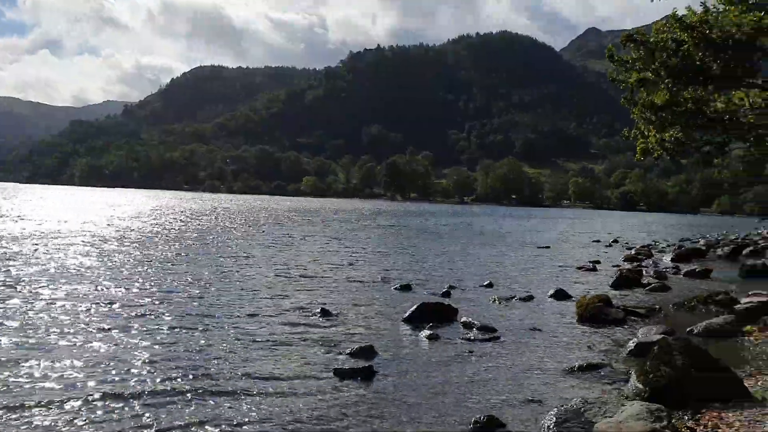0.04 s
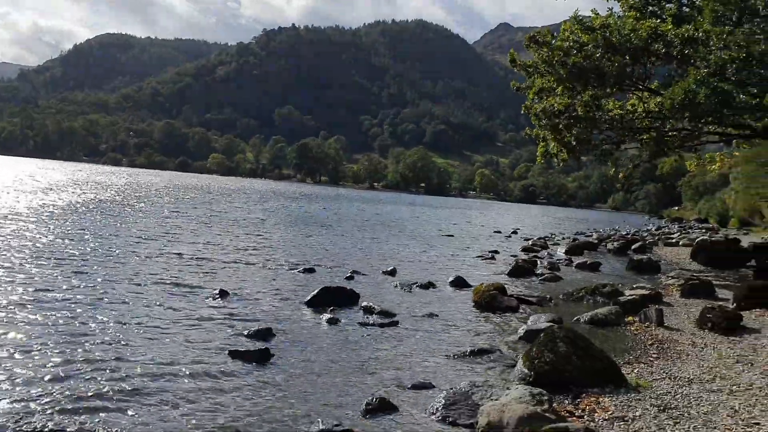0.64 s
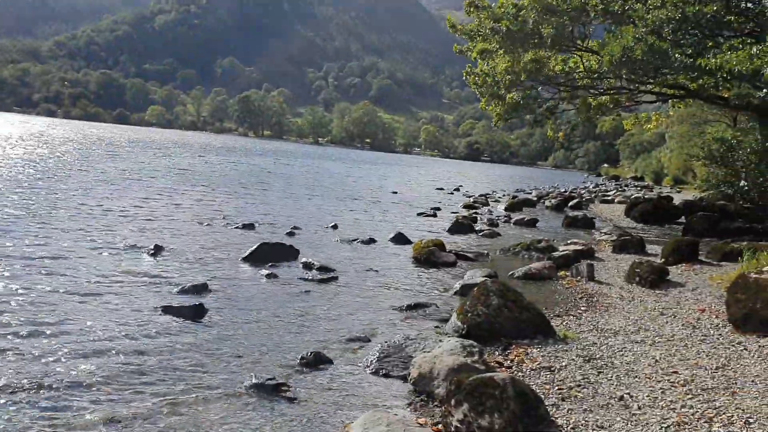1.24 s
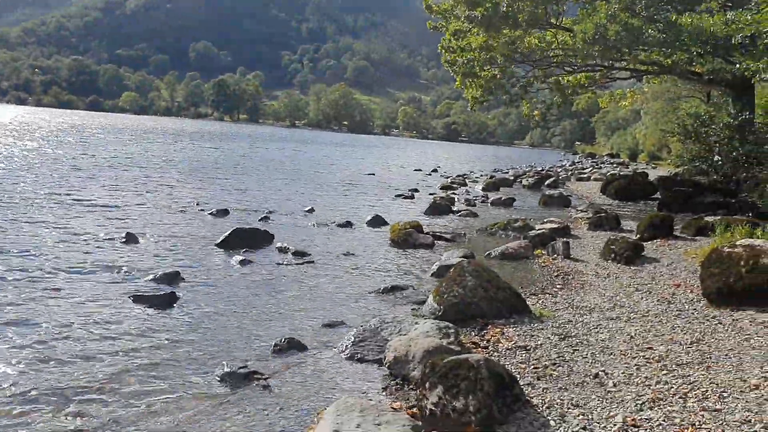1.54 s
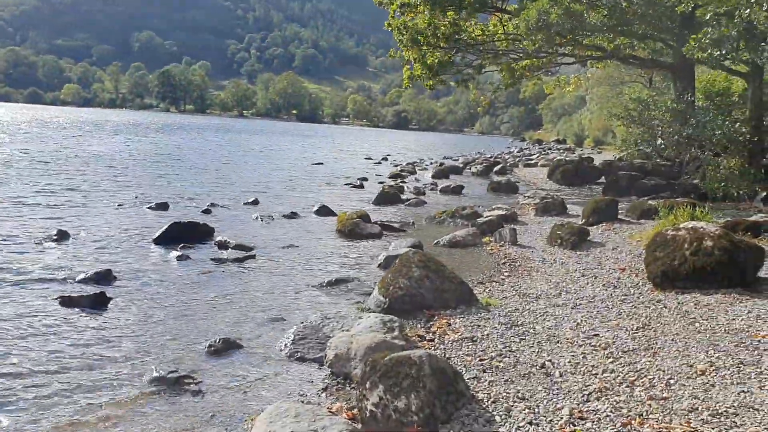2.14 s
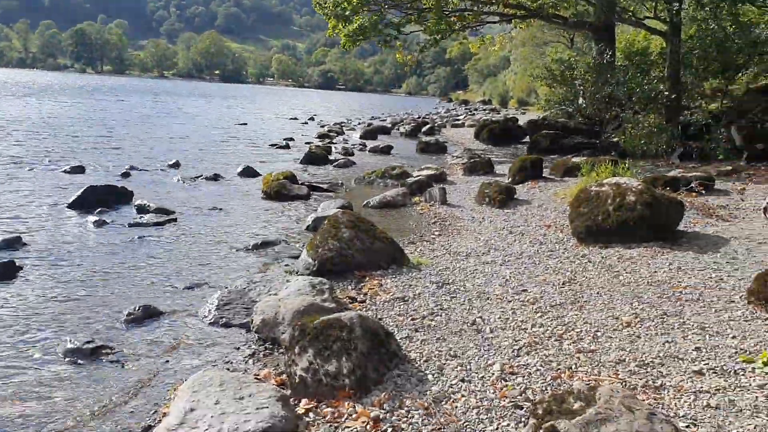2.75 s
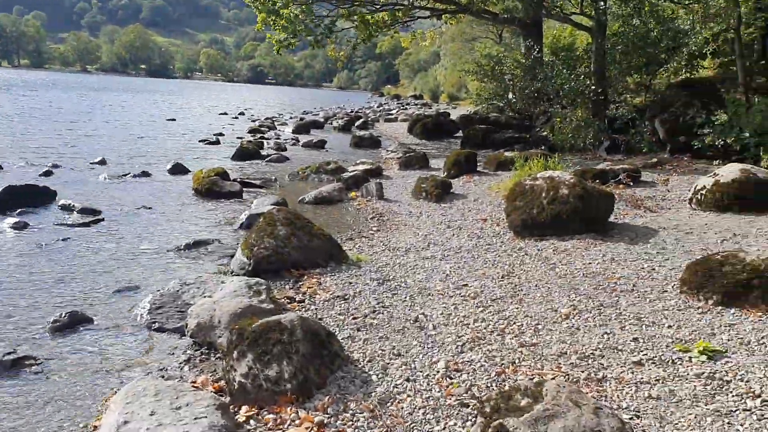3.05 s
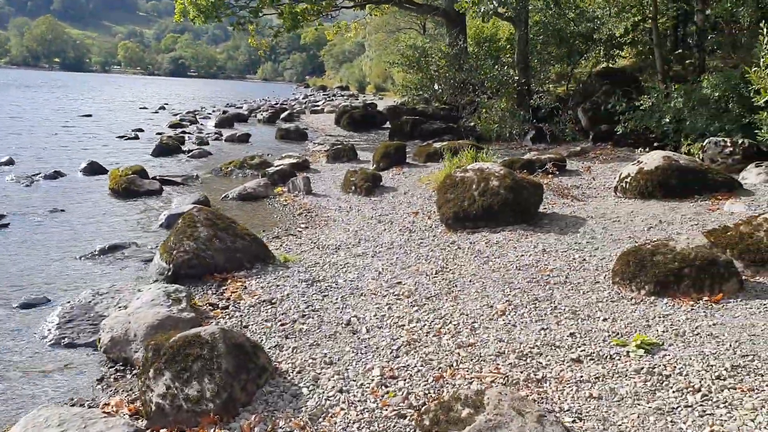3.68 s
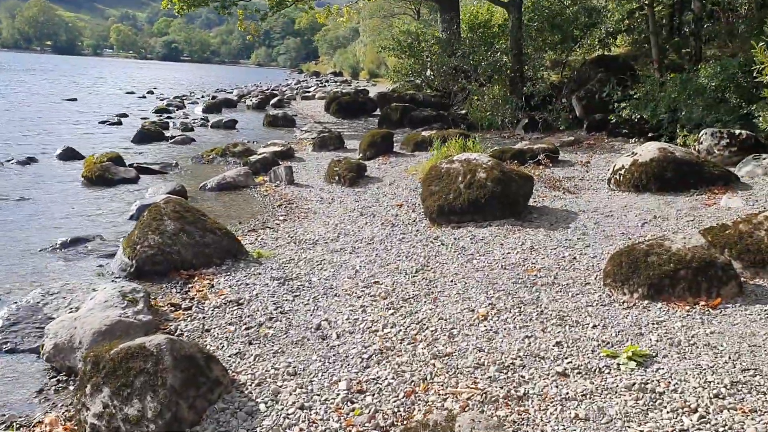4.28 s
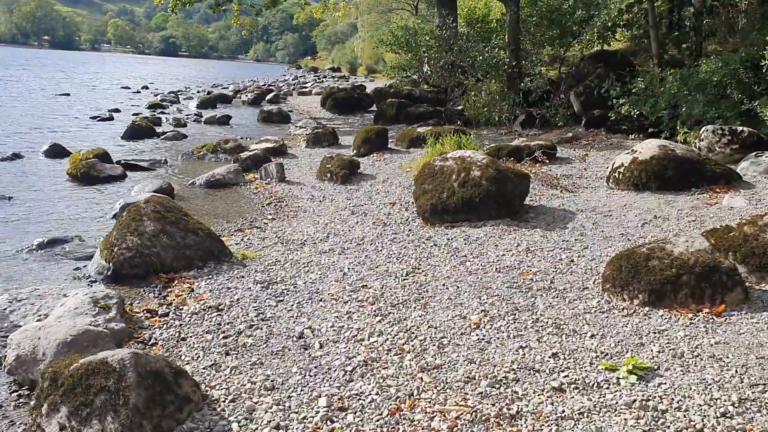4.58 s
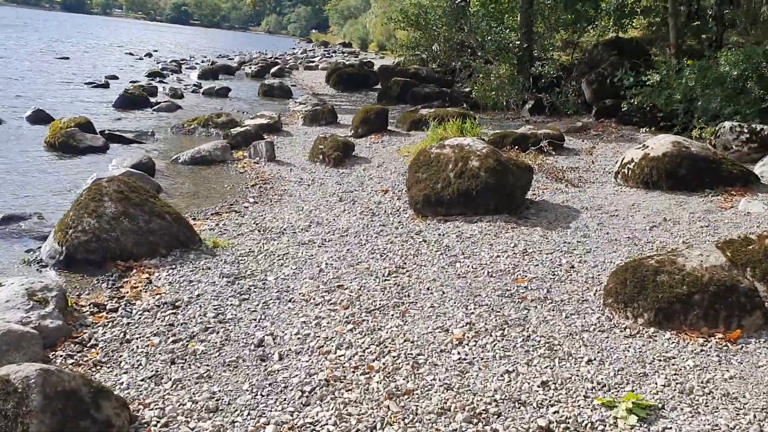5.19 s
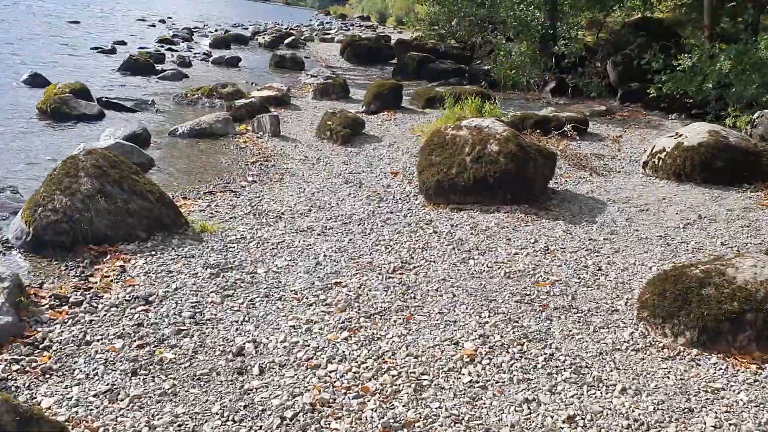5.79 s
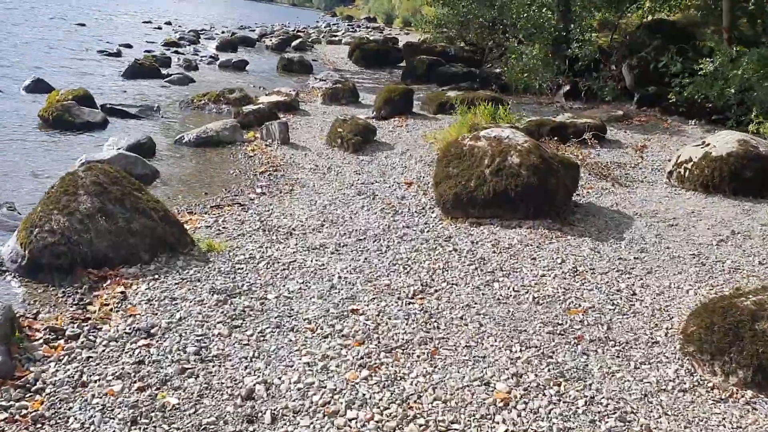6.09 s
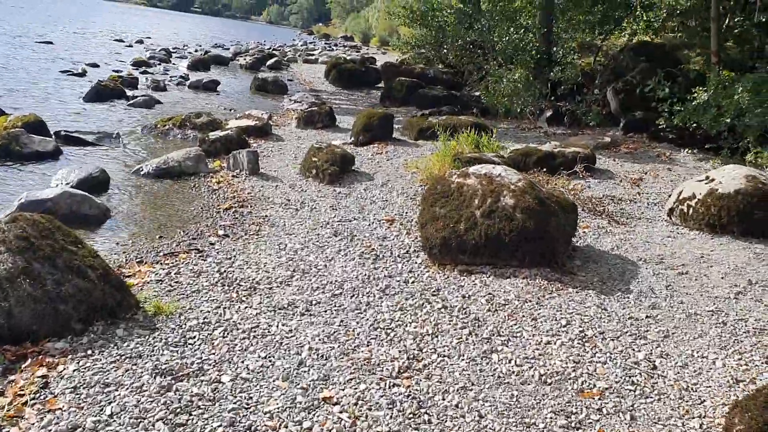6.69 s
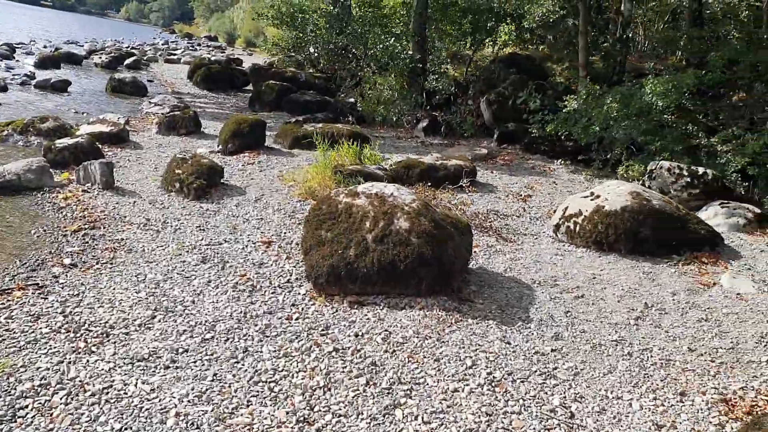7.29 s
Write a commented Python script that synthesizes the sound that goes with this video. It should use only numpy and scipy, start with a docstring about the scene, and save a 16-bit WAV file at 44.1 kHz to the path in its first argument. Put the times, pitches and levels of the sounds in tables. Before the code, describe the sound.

Wind buffets the microphone over slow, crunching steps on pebbles, with faint lapping water and a soft background hiss.

```python
"""Slow steps on a windy pebble beach

Each foot crunches into the pebbles, heel then ball, and single stones knock together.
Gusts hit the two microphone openings (ports), making rumble, flutter and popping swirls of air.
Small waves lap and bubble at the lake's edge under a steady hiss of water and leaves."""
import sys
import numpy as np
from scipy import signal
from scipy.fft import rfft, irfft, next_fast_len
from scipy.io import wavfile
from scipy.ndimage import uniform_filter1d, map_coordinates

SR = 44100
rng = np.random.default_rng(int(sys.argv[2]) if len(sys.argv) > 2 else 0)


def transcribe(u):
    """Save the signal u as a 16-bit wav file named by the first command-line argument.

    u: samples, shape (n,) or (channels, n), limited to [-1, 1]; the rate is SR.
    q: integer samples, one column per channel.
    """
    v = np.clip(np.atleast_2d(u).T, -1, 1)
    q = np.round(v * 32767).astype(np.int16)
    wavfile.write(sys.argv[1], SR, q)


N = 323253

# A heel or the ball of a foot pressing down: start_s, rise_s, fade_db_per_s, pebbles_db, stones_db,
# grit_db, stones_ring_hz, grit_ring_hz, grit_tilt_db_per_octave
CRUNCHES = [(1.385, 0.049, 35, -57, -51.0, -54, 3770, 9000.0, -1.0),
            (1.5, 0.155, 131, -41.5, -42.5, -50.5, 3700.0, 9000.0, -3),
            (2.877, 0.003, 300.0, -56, -45, -41, 5670.0, 9400.0, -2),
            (2.887, 0.093, 164, -41.5, -44, -47, 5000.0, 10100.0, -2),
            (3.08, 0.071, 40, -48.5, -53.5, -57.5, 3980, 10000.0, -2),
            (3.657, 0.047, 84, -38.5, -42, -47.5, 4200.0, 10600.0, 1),
            (3.726, 0.08, 154, -40, -52, -56, 3800.0, 10600.0, 0.0),
            (3.865, 0.038, 340.0, -50, -59, -54.5, 4000.0, 10600.0, 4),
            (4.338, 0.0022, 229, -40, -39.5, -37, 4000.0, 12000.0, 9),
            (4.372, 0.035, 75, -42, -49, -50, 2950, 12000.0, 5),
            (4.56, 0.1, 271, -53, -57.5, -59, 3000.0, 11000.0, -5),
            (5.073, 0.148, 169, -46, -51.5, -52.5, 3500.0, 10400, 1),
            (5.276, 0.033, 150.0, -65, -62, -55, 4000.0, 10440, 0.5),
            (5.849, 0.057, 167.0, -41, -45.5, -49.5, 2740.0, 10400.0, 7),
            (5.975, 0.059, 143.0, -54, -49.5, -51.5, 3000.0, 10400.0, 1.0),
            (6.405, 0.0098, 120, -38.0, -45.5, -41, 4520, 11000.0, -2),
            (6.46, 0.12, 172, -38.5, -46.5, -60, 3000.0, 11000.0, 8),
            (7.103, 0.041, 376.0, -34.5, -38.5, -40, 5760, 10300, -4),
            (7.18, 0.043, 378, -45.5, -43.5, -51, 4300, 10400.0, 4)]
# Single stones hitting each other: start_s, level_db, pitch_hz
PEBBLE_KNOCKS = [(.147, -34, 1520), (.151, -32, 1430), (2.105, -25.5, 1610), (2.145, -20.5, 1800),
                 (2.209, -21.5, 1300), (2.354, -30.5, 1020), (2.43, -34, 2400), (3.139, -29, 1240),
                 (3.214, -23.5, 1250), (3.277, -19, 1340), (3.326, -22, 1280), (5.087, -34, 1400),
                 (5.194, -23.5, 1220), (5.871, -30, 1950), (5.901, -19, 1390), (6.445, -20.5, 1110),
                 (6.472, -19.5, 1240), (6.601, -22, 1580), (7.049, -29, 1260)]
GRIT_SNAPS = [(.149, -27.5, 4000), (.303, -42, 3900), (2.064, -38, 4200), (2.486, -40, 8900),
              (2.703, -37, 3200), (2.879, -24, 8800), (2.882, -26, 5600), (2.928, -37, 4200),
              (3.686, -23, 4560), (3.772, -22.5, 3700), (4.343, -19.5, 11900), (4.362, -29, 9500),
              (4.371, -26, 10600), (4.391, -35, 12500), (5.405, -39, 9070), (5.415, -39, 8620),
              (5.48, -45, 8770), (5.902, -23, 2600), (6.025, -30.5, 3000), (6.257, -37, 9500),
              (6.306, -35, 9900), (6.353, -39, 9000), (6.427, -25, 10700), (6.442, -24, 11300),
              (6.491, -40, 11000), (6.613, -23, 5200), (7.124, -23, 5600), (7.245, -29, 3200)]
# The tones that a struck stone rings with: pitch_ratio, level_db
PEBBLE_TONES = [(.72, -49), (1, 9), (1.38, 0.5), (1.9, -7), (2.7, -12)]
GRIT_TONES = [(.7, -30), (.85, -4), (1, 12), (1.09, 2), (1.22, -5)]
# How strong the low and high sounds are in each size of stone: frequency_hz, level_db
PEBBLE_SPECTRUM = [(300, -49), (700, -2.5), (1100, -4), (1450, 1), (2000, -5.5), (2800, -10.5), (4000, -23),
                   (8000, -50)]
SMALL_STONE_SPECTRUM = [(1500, 10), (2400, -5), (3200, -4.5), (4200, -5.5), (5400, -3.5), (6500, -4),
                        (8000, -11), (14000, -50)]
GRIT_SPECTRUM = [(4500, 6.5), (7600, -8), (8700, -1.5), (10300, -4), (11700, -4.5), (13500, -7),
                 (16000, -6)]

# The slow rise and fall of the wind: time_s, rumble_db, flutter_db
WIND_LEVELS = [(0.0, -39.5, -47), (1.01, -42.3, -53), (1.75, -37.5, -50.2), (2.05, -40.5, -68),
               (2.45, -37.5, -51.5), (2.55, -47.5, -68), (2.82, -41.5, -43), (2.92, -32, -44.5),
               (3.59, -31.5, -32.5), (3.78, -27.5, -29.5), (4.35, -29, -35), (4.55, -34.7, -31.5),
               (4.85, -33.5, -33), (5.15, -39.5, -46), (5.27, -34, -33.5), (6.58, -32, -37.5),
               (6.74, -40.9, -56), (7.33, -33, -39)]
# Gusts on top of it: peak_s, length_s, rumble_db, flutter_db, left_minus_right_db
GUSTS = [(0.153, 0.024, -31, -53, -1), (0.23, 0.03, -38.5, -36, 6), (0.295, 0.02, -26, -35.5, 2),
         (0.616, 0.046, -27.5, -33.5, 1), (0.733, 0.044, -35.5, -40, -5), (0.89, 0.1, -36, -48.5, -5.5),
         (1.15, 0.15, -37, -35.5, -4), (1.294, 0.049, -39, -42.5, -3), (1.442, 0.03, -31.5, -38, -3),
         (1.543, 0.077, -35.5, -37, -2), (1.698, 0.039, -27.5, -36, 1.5), (1.86, 0.17, -34, -37, -3),
         (2.263, 0.063, -46, -41, 0.5), (2.464, 0.054, -33.5, -48, -3), (2.709, 0.069, -29, -38, -5),
         (3.09, 0.055, -26, -37.5, -6), (3.509, 0.025, -29, -31, -8), (3.805, 0.17, -30, -26, -2),
         (4.161, 0.057, -38, -23, -4.5), (4.24, 0.031, -20, -25.5, 1), (4.348, 0.14, -28, -22.5, 0),
         (4.456, 0.043, -42, -24, 3), (4.71, 0.11, -43, -23.5, -1.5), (4.817, 0.079, -30, -27.5, -1),
         (5.018, 0.067, -36, -32, -0.5), (5.425, 0.04, -49, -31.5, -2), (5.919, 0.06, -21.5, -26, -0.5),
         (6.022, 0.049, -26, -33, 0), (6.31, 0.17, -36, -30, -0.5), (6.552, 0.096, -35, -25, 1),
         (6.676, 0.032, -36, -29.5, 4.5), (6.814, 0.036, -30, -31.5, 1.5), (6.883, 0.038, -43, -30, -3),
         (7.002, 0.07, -34, -44.5, -2), (7.239, 0.0094, -24.5, -31, -6.5)]
# The hardest swirls of air: time_s, level_db, pitch_hz, relative_rasp_db, left_minus_right_db
EDDIES = [(0.22, -14, 291, -38, 1), (0.29, -24, 370, -24, 4), (0.636, -18.5, 414, -19, -2),
          (0.777, -21, 335, -26, 1), (1.181, -16.5, 392, -35, 13), (1.84, -17, 360, -25, -7),
          (3.103, -15, 160, -14, -3), (3.495, -12, 430, -19, -1), (3.567, -23.5, 454, -1, 9),
          (3.974, -12, 107, -29, -6), (4.055, -17, 440, -3.5, -11.5), (4.152, -13.5, 430, -7, 7),
          (4.185, -18, 560, -2.5, -14), (4.226, -2, 393, -10.5, -0.5), (4.244, -6, 402, -24, -2),
          (4.277, -9.5, 500, -2, 1), (4.394, -19.5, 340, 4.5, -8), (4.668, -13, 400, -1.5, 5),
          (4.703, -11.0, 407, -6.5, -1), (4.722, -10.9, 445, -26, 11), (4.769, -14.5, 458, -16, 1),
          (5.778, -14.5, 517, -11, 5.5), (5.967, -13, 413, -20, -2), (6.343, -20.5, 420, -0.5, -1),
          (6.506, -10, 483, -11, 1.5), (6.818, -17, 370, -22, -2)]
# The wind's deep, middle and bright sounds: frequency_hz, level_db
RUMBLE_SPECTRUM = [(15, -24), (30, -13), (55, -4), (80, 0), (120, -5), (200, -13), (350, -19), (800, -88),
                   (2000, -92)]
FLUTTER_SPECTRUM = [(80, -14), (180, -6), (280, -2), (370, -0.5), (480, -5), (650, -18), (900, -33),
                    (1400, -38), (3000, -93), (8000, -110)]
TEARING_SPECTRUM = [(200, -55), (450, 3), (650, 4.5), (900, -5), (1400, -28), (2200, -30), (4000, -65),
                    (9000, -68)]

# Small waves running up the shore: peak_s, level_db
WAVES = [(0.57, -59), (0.81, -60.5), (1.25, -53.5), (1.81, -46.5), (2.13, -49.5), (2.43, -51), (3.17, -57),
         (3.57, -53), (4.04, -49.5), (4.55, -51), (5.66, -57.5), (6.36, -53), (7.07, -53)]
# Single bubbles at the water's edge: start_s, level_db, pitch_hz
PLIPS = [(.526, -50, 2050), (.559, -45, 2370), (1.86, -39.5, 2540), (3.423, -40.5, 2080),
         (3.653, -40, 2350), (6.815, -45, 2150)]
# Level of the background hiss, which dips when strong wind hits the microphone: time_s, level_db
HISS_LEVELS = [(0.0, -51), (1.6, -50), (2.51, -50), (3.74, -48.5), (4.15, -52.6), (4.55, -51),
               (4.75, -57.5), (5.8, -54.5), (6.33, -49), (6.79, -51.5), (7.33, -50.7)]
# The tone of the waves and of the hiss: frequency_hz, level_db
LAPPING_SPECTRUM = [(300, -22), (700, 8.5), (1300, 1.5), (2400, 3), (4000, -0.5), (7000, -17), (12000, -40)]
HISS_SPECTRUM = [(530, 7.5), (900, 1.5), (1080, -1), (1260, -3), (1450, -5.5), (4380, -5.5), (6740, -10.5),
                 (7340, -14.5), (8570, -8), (9780, -8), (11800, -11.5), (14400, -19), (15800, -24)]

HOLD_S = 0.016  # time with full weight on the stones
WAKE_DB, WAKE_RISE_S, WAKE_FADE_S = -13, .0015, 0.069  # churning air behind an eddy
WAVE_S, RIPPLE_DB = 0.15, -62  # length of a wave; level of the ripples between waves
TOP_HZ = 15900


def steps():
    """Under each foot pebbles grind, small stones rattle and grit sizzles, in jerks as they give way."""
    grinding = shingle(PEBBLE_SPECTRUM, per_s=1000, band_hz=(900, 2800),
                       cycles=3, spread_db=3.8, scatter=.55)
    rattle = shingle(SMALL_STONE_SPECTRUM, per_s=1300, band_hz=(2300, 7500),
                     cycles=4, spread_db=4.2, scatter=1.5)
    sizzle = shingle(GRIT_SPECTRUM, per_s=2200, band_hz=(7000, 15000),
                     cycles=3, spread_db=4.2, scatter=1.4)
    out = np.zeros((2, N))
    for s, rise_s, fade, pebbles_db, stones_db, grit_db, stones_hz, grit_hz, tilt_db in CRUNCHES:
        span = np.arange(N)[round(s * SR):][:2 * SR // 3]
        t = np.arange(len(span)) / SR
        press = np.sin(np.pi / 2 * np.minimum(t / rise_s, 1)) ** 2
        release = amp(-fade * np.maximum(t - rise_s - HOLD_S, 0))
        pebbles = amp(pebbles_db) * grinding[:, span]
        stones = amp(stones_db) * ringing(rattle[:, span], stones_hz, boost_db=5, octaves=0.34)
        grit = amp(grit_db) * ringing(sizzle[:, span], grit_hz, boost_db=1.5, octaves=.15, tilt=tilt_db)
        out[:, span] += press * release * (pebbles + stones + grit)
    jerks = unit(amp(0.76 * wobble(120) + 1.9 * wobble(35)))
    return out * jerks


def shingle(spectrum, per_s, band_hz, cycles, spread_db, scatter):
    """Countless tiny stone clicks, heard directly and bouncing off the beach."""
    direct, left, right = [grains(per_s, band_hz, cycles, spread_db) for _ in range(3)]
    clicks = from_the_ground(direct) + scatter * np.array([left, right])
    return steady(coloured(clicks, spectrum), seconds=0.033)


def ringing(x, ring_hz, boost_db, octaves, tilt=0):
    """A patch of beach rings around its own pitch; tilt (dB per octave) brightens or dulls it."""
    def response(hz):
        octaves_away = np.log2(np.maximum(hz, ring_hz / 2) / ring_hz)
        return amp(tilt * octaves_away + boost_db * np.exp(-(octaves_away / octaves) ** 2))
    return unit(filtered(x, response))


def stone_hits(hits, tones, fade_s, crack, echo_db, echo_s):
    """Stone on stone: a crack and a few short tones, echoed faintly by the stones around."""
    out, t = np.zeros(N), np.arange(SR // 20) / SR
    for s, db, hz in hits:
        ring = sum(amp(tone_db) * np.sin(2 * np.pi * hz * ratio * (1 + .02 * rng.normal()) * t)
                   for ratio, tone_db in tones)
        click = (ring + crack * rng.standard_normal(len(t))) * amp(-60 * t / fade_s)
        echoes = rng.standard_normal(len(t)) * amp(echo_db - 60 * t / echo_s)
        echoes[0] = 1  # the direct sound
        add(out, s + .0008, signal.fftconvolve(amp(db) * click / np.abs(click).max(), echoes))
    return from_the_ground(out)


def wind():
    """Rumble and flutter on the ports swell with each gust; the hardest gusts tear into brighter pops."""
    base_rumble_db, base_flutter_db = curves(WIND_LEVELS)
    rumble_db, flutter_db = np.zeros((2, 2, N))
    peak_s, length_s, low_db, mid_db, pan_db = np.transpose(GUSTS)
    for port, side in enumerate((.5, -.5)):
        rumble_db[port] = swelling(base_rumble_db, zip(peak_s, length_s, low_db + side * pan_db))
        flutter_db[port] = swelling(base_flutter_db, zip(peak_s, length_s, mid_db + side * pan_db))
    rumble = steady(turbulence(lump_db=7.0, lumps_per_s=45, shared=0.78), seconds=0.053)
    soft_puffs = puffs(per_s=380, spread_db=5.5, crossing_ms=2.077) + 0.26 * rng.standard_normal((2, N))
    flutter = steady(coloured(soft_puffs, FLUTTER_SPECTRUM), seconds=0.047) * amp(1.53 * wobble(22))
    hard_puffs = puffs(per_s=150, spread_db=7.5, crossing_ms=1.694)
    pops = steady(coloured(hard_puffs, TEARING_SPECTRUM), seconds=0.2)
    pops_db = -33.5 + 1.56 * (flutter_db + 24)  # pops grow faster than the flutter
    return amp(rumble_db - 0.02) * rumble + amp(flutter_db - 0.28) * flutter + amp(pops_db) * pops


def turbulence(lump_db, lumps_per_s, shared):
    """Rough air rumbles in lumps, partly the same lumps at both ports."""
    common, left, right = [wobble(lumps_per_s) for _ in range(3)]
    lumps = np.sqrt(shared) * common + np.sqrt(1 - shared) * np.array([left, right])
    return coloured(rng.standard_normal((2, N)) * amp(lump_db * lumps), RUMBLE_SPECTRUM)


def puffs(per_s, spread_db, crossing_ms):
    """Random puffs of air; each meets the two ports at slightly different times and strengths."""
    draws = rng.standard_normal((int(per_s * N / SR), 6)).T
    direction, strength, port_strength, port_delay = draws[0], draws[1], draws[2:4], draws[4:]
    starts = rng.random(len(strength)) * N
    out = np.zeros((2, N))
    for port in range(2):
        size = np.sign(direction) * amp(spread_db * np.clip(strength + port_strength[port] / 2, -3, 2))
        arrivals = starts + port_delay[port] * crossing_ms * SR / 1000
        out[port] = np.bincount(arrivals.astype(int) % N, size, N)
    return unit(out)


def eddies(crossing_ms=0.42, rasp_hz=950):
    """A swirl of air passes both ports: a quick swing of pressure, a sharp rasp, then a churning wake."""
    out, t = np.zeros((2, N)), np.arange(-SR // 50, SR // 20) / SR
    wake_shape = (1 + np.tanh(t / WAKE_RISE_S)) / 2 * amp(WAKE_DB - 60 * t / WAKE_FADE_S)

    def swing(hz, phase, cycles):
        bell = np.exp(-(t * hz / cycles) ** 2)
        return bell * np.cos(2 * np.pi * (hz * t + phase + 0.14 * rng.normal()))

    for s, db, hz, rasp_db, pan_db in EDDIES:
        phase = rng.random()
        for port, side in zip(out, (.5, -.5)):
            body = swing(hz, phase, cycles=0.74)
            rasp = amp(rasp_db - 2) * swing(rasp_hz, phase, cycles=0.56)
            churn = coloured(rng.standard_normal(len(t)), FLUTTER_SPECTRUM)
            tearing = 2 * amp(rasp_db) * coloured(rng.standard_normal(len(t)), TEARING_SPECTRUM)
            wake = (churn + tearing) * wake_shape
            start_s = s + t[0] + crossing_ms * rng.normal() / 1000
            add(port, start_s, amp(db - 3.5 + side * pan_db) * (body + rasp + wake))
    return out


def waves():
    """Small waves fizz and bubble among the rocks."""
    level_db = swelling(RIPPLE_DB, [(s, WAVE_S, db) for s, db in WAVES])
    bubbles = [grains(per_s=600, band_hz=(1005, 4520), cycles=5.3, spread_db=5.5, rise=0.019)
               for _ in range(2)]
    wash = np.array(bubbles) + 0.63 * rng.standard_normal((2, N))
    return amp(level_db + 0.83 * wobble(41)) * coloured(wash, LAPPING_SPECTRUM)


def plips(fade_s=0.046, onset_s=0.00031, rise=1.9):
    """A bubble rings briefly and rises in pitch as it nears the surface."""
    out, t = np.zeros(N), np.arange(SR // 20) / SR
    for s, db, hz in PLIPS:
        loudness = amp(db - 60 * t / fade_s) * (1 - np.exp(-t / onset_s))
        add(out, s, loudness * np.sin(2 * np.pi * hz * t * (1 + rise * t)))
    return from_the_ground(out)


def hiss():
    """The lake and the leaves blend into one background hiss."""
    level_db, = curves(HISS_LEVELS)
    noise = rng.standard_normal((2, N)) + 0.22 * rng.standard_normal(N)
    return amp(level_db) * coloured(noise, HISS_SPECTRUM)


def grains(per_s, band_hz, cycles, spread_db, rise=0):
    """A random stream of tiny fading rings; rise bends each one upward like a bubble."""
    low_hz, high_hz = band_hz
    when, pitch, strength, direction = np.hsplit(rng.random((int(per_s * N / SR), 4)), 4)
    hz = low_hz * (high_hz / low_hz) ** pitch
    size = amp(spread_db * np.minimum(-np.log(1 - strength), 3.5)) * np.sign(direction - .5)
    n = np.arange(min(int(3.5 * cycles * SR / low_hz), 500))
    age = np.float32(hz / SR / cycles) * np.float32(n)
    rings = size * np.exp(-age) * np.sin(2 * np.pi * cycles * age * (1 + rise * age))
    positions = (when * N).astype(int) + n
    return unit(np.bincount(positions.ravel(), rings.ravel(), N)[:N])


def from_the_ground(x, lag_ms=0.086):
    """Sound from the beach reaches the left port a little before the right."""
    return filtered(x, lambda hz: np.exp(1j * np.pi * hz * lag_ms / 1000 * np.array([[1], [-1]])))


def amp(db):
    """Turn decibels into a number to multiply by."""
    return 10 ** (np.asarray(db) / 20)


def unit(x):
    """Scale x to an average (rms) level of 1."""
    return x / np.sqrt(np.mean(x ** 2) + 1e-20)


def steady(x, seconds):
    """Even out slow changes in level but keep the quick bursts."""
    size = int(seconds * SR)
    power = uniform_filter1d(uniform_filter1d(np.mean(x ** 2, axis=0), size), size)
    return x / np.sqrt(np.abs(power) + 1e-9)


def swelling(base_db, swells):
    """A level in dB with smooth bumps on top, each given as peak_s, length_s, level_db."""
    t = np.arange(0, N, 64) / SR
    power = sum(amp(db) ** 2 * np.exp(-(2 * (t - s) / length) ** 2) for s, length, db in swells)
    return 10 * np.log10(amp(base_db) ** 2 + np.interp(np.arange(N) / SR, t, power))


def curves(rows):
    """Join a table's points with lines: one curve for each column after the time."""
    times, *columns = np.transpose(rows)
    return [np.interp(np.arange(N) / SR, times, column) for column in columns]


def wobble(per_s):
    """A smooth curve through per_s random points a second."""
    return map_coordinates(rng.standard_normal(int(N * per_s / SR) + 4), [np.arange(N) * per_s / SR])


def filtered(x, response):
    """Scale or delay each frequency in x as response(hz) says."""
    n = x.shape[-1]
    padded = next_fast_len(n + 4096, True)
    return irfft(rfft(x, padded) * response(np.fft.rfftfreq(padded, 1 / SR)), padded)[..., :n]


def coloured(x, spectrum):
    """Give x the tone of a spectrum table, at an average level of 1."""
    points_hz, db = np.transpose(spectrum)
    return unit(filtered(x, lambda hz: amp(np.interp(np.log(hz + 1), np.log(points_hz), db))))


def add(track, s, sound):
    """Mix a sound into a track, starting at s seconds."""
    start = int(np.clip(round(s * SR), 0, N - 1))
    track[start:start + len(sound)] += sound[:N - start]


def scene():
    """Feet, wind and water together, in stereo."""
    knocks = stone_hits(PEBBLE_KNOCKS, PEBBLE_TONES, fade_s=0.01, crack=0.15, echo_db=-28, echo_s=0.044)
    snaps = stone_hits(GRIT_SNAPS, GRIT_TONES, fade_s=0.0043, crack=0.67, echo_db=-21, echo_s=0.031)
    feet = steps() + amp(-1) * knocks + amp(1) * snaps
    return feet + wind() + eddies() + hiss() + waves() + plips()


def record(dry):
    """Cut away all sound above TOP_HZ."""
    return filtered(dry, lambda hz: hz < TOP_HZ)


dry = scene()
out = record(dry)
transcribe(out)
```